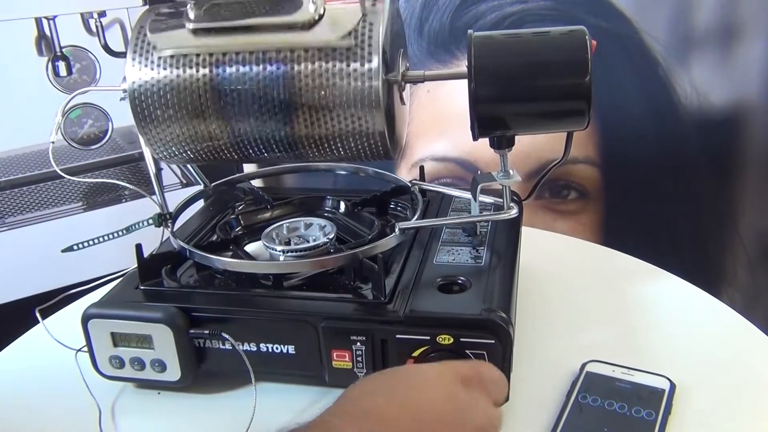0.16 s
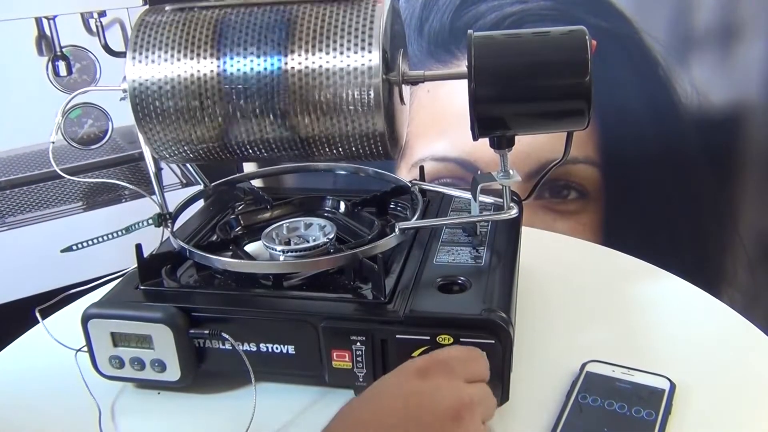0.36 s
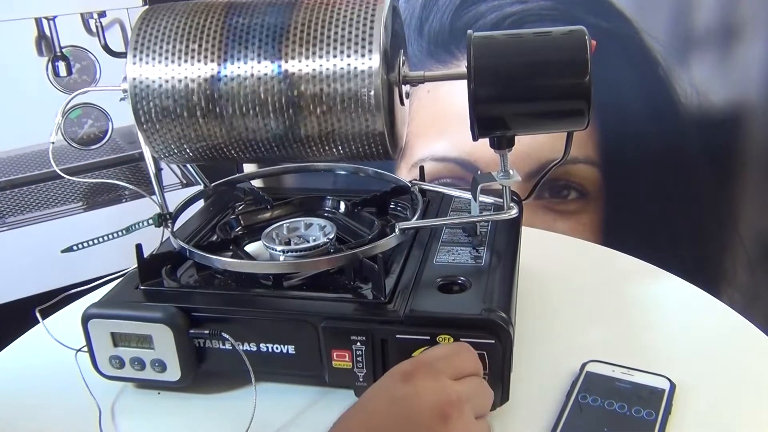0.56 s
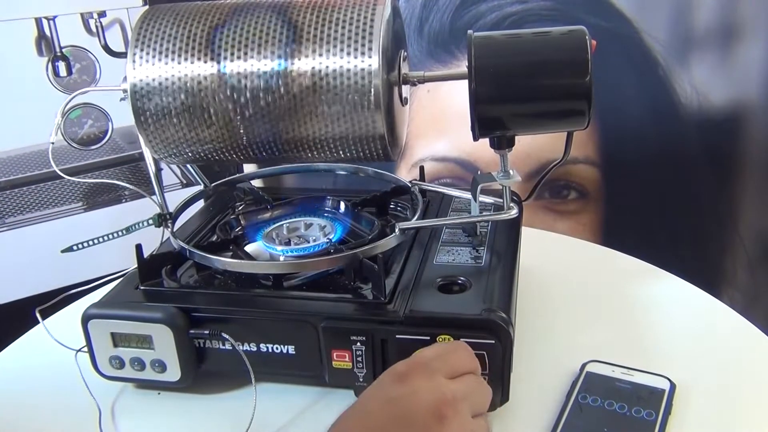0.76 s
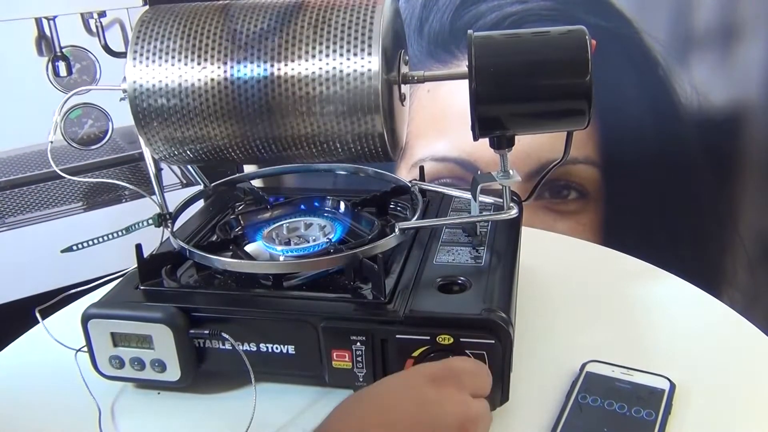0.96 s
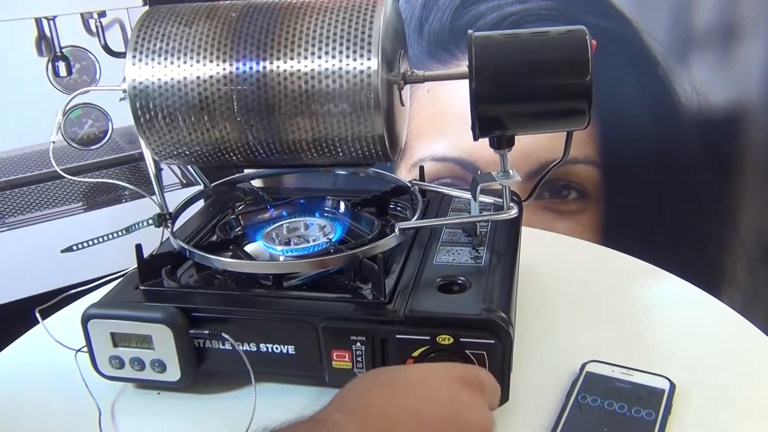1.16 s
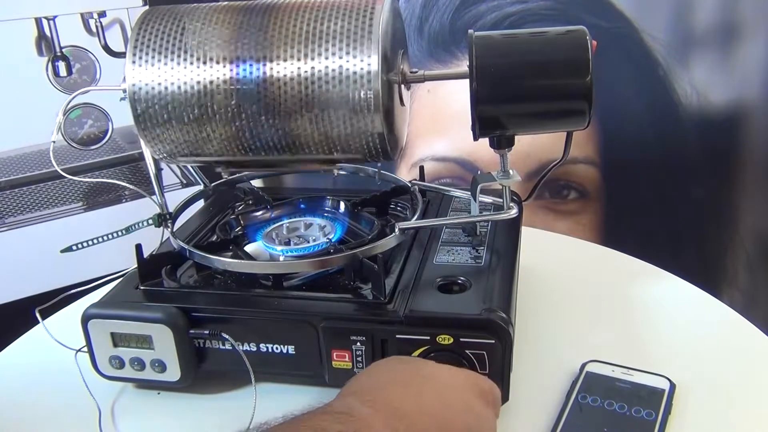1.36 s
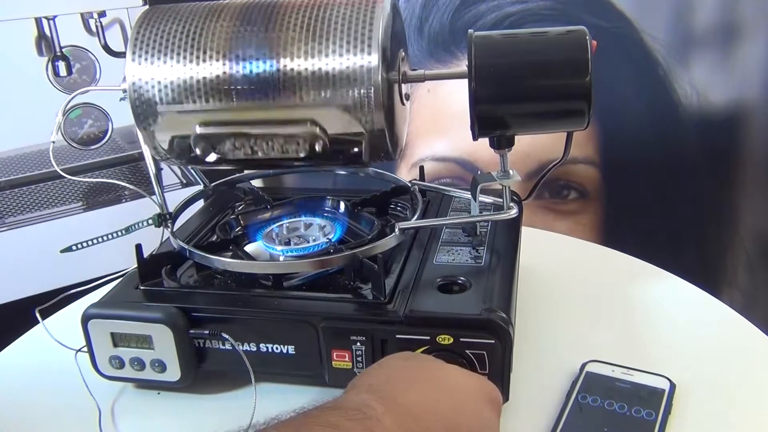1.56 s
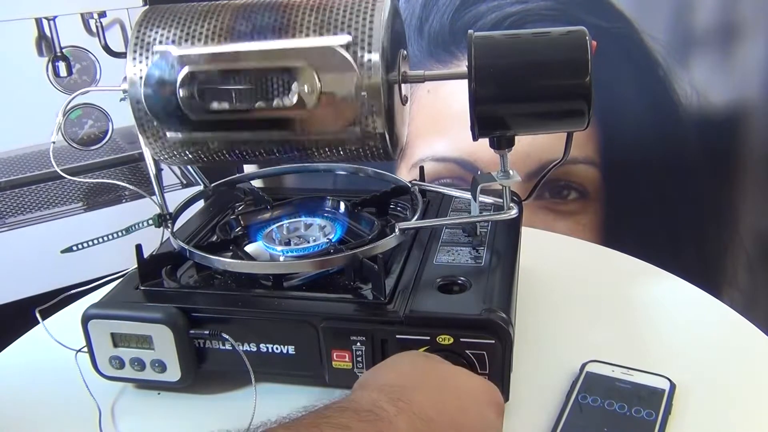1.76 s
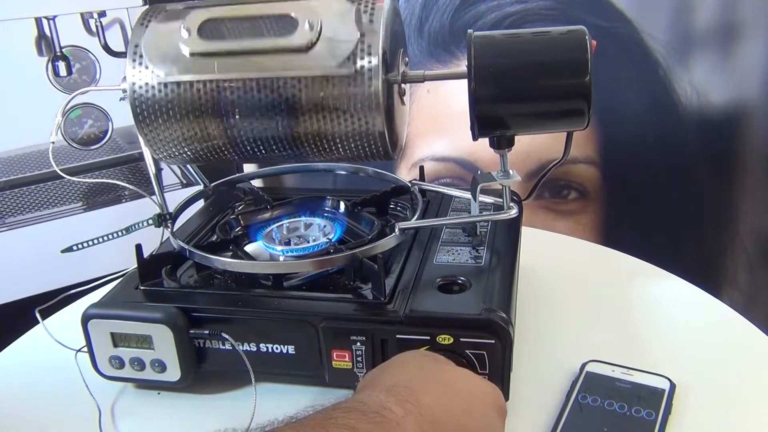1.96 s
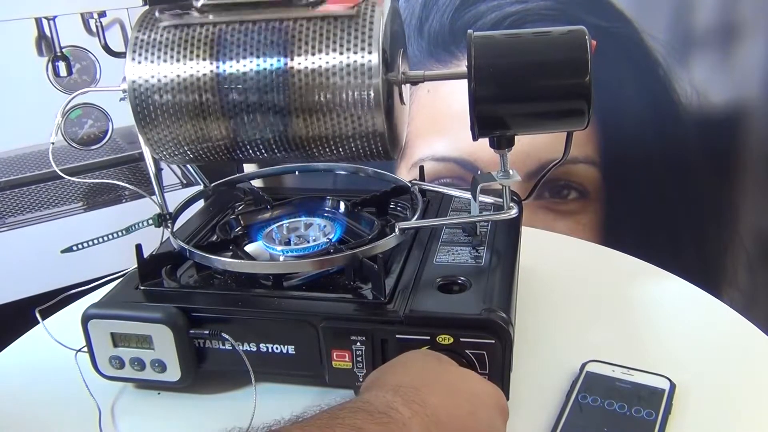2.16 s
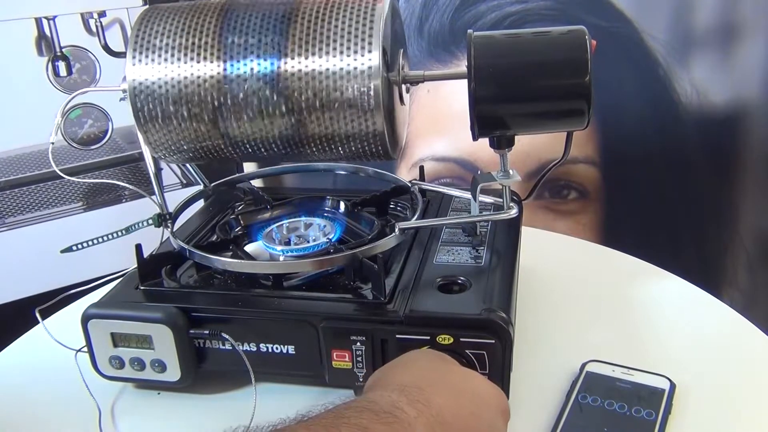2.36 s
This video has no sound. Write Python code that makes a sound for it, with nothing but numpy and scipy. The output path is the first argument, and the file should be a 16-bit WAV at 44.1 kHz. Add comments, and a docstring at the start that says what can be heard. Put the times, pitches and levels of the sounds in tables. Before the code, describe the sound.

Bright rushing rustle of beans sliding in a steel drum, with one sharp stove igniter snap

```python
"""Coffee beans in a roasting drum

Beans tumble in a perforated steel drum over a small gas stove: thousands of random taps excite ringing sheet.
An igniter snaps (two beating sines), the stove rattles (struck modes) and the flame catches
(shaped, lumpy noise with low thuds), over a hum of motor, gas and room (filtered noise)."""
import sys
import numpy as np
from scipy import signal
from scipy.fft import rfft, irfft
from scipy.io import wavfile
from scipy.ndimage import uniform_filter1d

SR = 44100
rng = np.random.default_rng(int(sys.argv[2]) if len(sys.argv) > 2 else 0)


def attenuation_scalar(level_db):
    """Turn a level in dB into a linear amplitude multiplier (20 dB per decade)."""
    decades = np.asarray(level_db, float) / 20
    return 10 ** decades


def materialize(psi):
    """Save the field psi as 16-bit PCM at rate SR to the path in sys.argv[1].

    A 1-D psi becomes a single channel; in a 2-D psi each row is a channel.
    """
    bounded = np.clip(np.atleast_2d(psi).T, -1, 1)
    quanta = np.round(bounded * 32767).astype(np.int16)
    wavfile.write(sys.argv[1], SR, quanta)


N = 106854


def evened(x):
    """Scales to rms 1."""
    return x / np.sqrt(np.mean(x ** 2) + 1e-20)


def read(points, hz):
    """Reads a spectrum table on a log frequency axis."""
    f, value = np.transpose(points)
    return np.interp(np.log(hz + 1), np.log(f + 1), value)


def curve(table, column):
    """Interpolates one column of a time table at every sample."""
    return np.interp(np.arange(N) / SR, [row[0] for row in table], [row[column] for row in table])


def colour(x, points):
    """Causal minimum-phase filter with the given spectrum, from its log magnitude."""
    hz = np.abs(np.fft.fftfreq(4096, 1 / SR))
    log_gain = np.maximum(read(points, hz), -90) * np.log(10) / 20
    impulse = np.fft.ifft(np.exp(np.conj(signal.hilbert(log_gain)))).real[:2048]
    return signal.oaconvolve(x, impulse)[:len(x)]


def resonate(x, hz, width_hz):
    """Resonance of gain 1 that can follow a pitch curve: shift to 0 Hz, smooth, shift back."""
    turn = np.exp(2j * np.pi * np.cumsum(hz * np.ones(len(x))) / SR)
    r = np.exp(-np.pi * width_hz / SR)
    return 2 * (turn * signal.lfilter([1 - r], [1, -r], x / turn)).real


def burst(t60_s, db):
    """Click followed by a dying noise scatter; db is scatter energy over click energy."""
    t = np.arange(4000) / SR
    tail = rng.standard_normal(len(t)) * attenuation_scalar(-60 * t / t60_s)
    return np.append(1, attenuation_scalar(db) * tail / np.linalg.norm(tail))


def band(x, hz, kind):
    """Low or high pass without delay."""
    low = 1 / (1 + (np.fft.rfftfreq(N, 1 / SR) / hz) ** 6)
    gain = low if kind == "low" else 1 - low
    return irfft(rfft(x) * gain, N)


def sway():
    """Slow random wander of rms 1, a few swings a second."""
    steps = evened(uniform_filter1d(rng.standard_normal(40), 3))
    return np.interp(np.arange(N), np.linspace(0, N, 40), steps)


def hum():
    """Noise rumble in three swelling bands, resonated motor tones, and a left-minus-right noise part."""
    # motor, gas and room: (frequency [Hz], density [dB per Hz])
    hum_colour = [(15, -45), (30, -12), (70, -17), (110, -12), (205, -1), (290, -6), (370, 1), (470, -10.5),
                  (560, -3), (700, -8.5), (860, -2), (1050, -8), (1600, -6), (2100, -13), (3500, -90)]
    # swells: (time [s], below 110 Hz [dB], 110-560 Hz [dB], above 560 Hz [dB])
    hum_level = [(0.0, -85, -60.5, -49.5), (0.2, -75, -54, -49.5), (0.36, -69, -64, -54),
                 (0.5, -53.5, -58.5, -55), (0.67, -59, -66, -58), (0.97, -66, -80, -58),
                 (1.13, -69, -55, -76), (1.32, -65, -51, -59.5), (1.46, -61, -60, -61.5),
                 (1.68, -74, -54.5, -64), (1.83, -70, -48.5, -58), (1.96, -71, -55, -58),
                 (2.16, -78, -56.5, -57), (2.42, -59, -63.5, -54)]
    # wavering motor tones: (frequency [Hz], level [dB], width of each of two passes [Hz])
    motor = [(204, -64.5, 12), (423.7, -66.5, 3.2)]
    # left-minus-right part: (frequency [Hz], density [dB per Hz])
    hum_wide = [(12, -31), (20, 17), (209, 11), (600, 2), (900, -10), (1300, -50), (3300, -120)]
    wide_db = -65.5

    z = rfft(rng.standard_normal((3, N)), axis=1)
    hz = np.fft.rfftfreq(N, 1 / SR)
    wash = irfft(z[0] * attenuation_scalar(read(hum_colour, hz)), N)
    deep, high = band(wash, 110, "low"), band(wash, 560, "high")
    parts = (deep, wash - deep - high, high)
    mid = sum(evened(part) * attenuation_scalar(curve(hum_level, k)) for k, part in enumerate(parts, 1))
    noise = irfft(z[1], N)
    for tone_hz, db, width_hz in motor:
        mid += attenuation_scalar(db) * evened(resonate(resonate(noise, tone_hz, width_hz), tone_hz, width_hz))
    side = attenuation_scalar(wide_db) * evened(irfft(z[2] * attenuation_scalar(read(hum_wide, hz)), N))
    return mid, side


def flame():
    """Gas catching: coloured noise with a fast rise, a hold, an exponential fall and lumpy level."""
    # catching flame: (frequency [Hz], density [dB per Hz])
    flame_colour = [(35, -60), (60, -14), (233, -2), (710, -5), (923, 14.5), (1390, -1), (1930, -7),
                    (3000, 5), (3900, -17), (6600, -120)]
    start_s, rise_s, hold_s, fall_s = 0.669, 0.014, 0.097, 0.049
    level_db, lumps_db = -40, 2.7  # noise rms before shaping; rms of the level's wander

    t = np.arange(N) / SR - start_s
    shape = np.clip(t / rise_s, 0, 1) * np.exp(-np.maximum(t - rise_s - hold_s, 0) / fall_s)
    lumps = attenuation_scalar(lumps_db * evened(uniform_filter1d(rng.standard_normal(N), 400)))
    return attenuation_scalar(level_db) * shape * lumps * evened(colour(rng.standard_normal(N), flame_colour))


def thuds():
    """Stove case: low sines that swell in softly and die fast."""
    # soft thuds: (time [s], level before rise and decay [dB], frequency [Hz])
    thud_table = [(.718, -37.5, 242), (0.786, -33.5, 240)]
    rise_s, t60_s = .008, .11

    out, t = np.zeros(N), np.arange(6000) / SR
    for start_s, db, hz in thud_table:
        envelope = attenuation_scalar(db - 60 * t / t60_s) * np.minimum(t / rise_s, 1)
        out[round(start_s * SR):][:len(t)] += envelope * np.sin(2 * np.pi * hz * t)
    return out


def stove():
    """Each blow rings the same body modes, tilted by how hard it strikes, damped by how freely they ring."""
    # blows: (time [s], level [dB], brightness [0-1], freedom to ring, scales t60 [0-1])
    knocks = [(.3, -43, 0.9, .6), (0.677, -43, 0.9, 0.4), (0.6821, -30.5, 0.83, 0.9), (0.69, -39, 1, 0.1),
              (0.696, -28.5, 0.7, 0.22), (0.703, -32.5, 0.72, 0.83), (.715, -33, 0.66, 0.55),
              (0.727, -30, 0.46, 0.6), (0.743, -36.5, 0.66, 0.97), (0.771, -41, 0.6, 1),
              (0.794, -36.5, 0.47, 0.47), (1.141, -41, 0.95, 1), (2.0135, -31.5, 0.64, 0.26),
              (2.0172, -35, 0.36, 0.4), (2.022, -39, 0.2, 0.7)]
    # body modes: (frequency [Hz], relative level [dB], t60 at full freedom [s])
    modes = [(355, -7, 0.15), (492, -6, .07), (617, -5, 0.07), (800, -5, 0.06), (950, -7, 0.07),
             (1060, -6, 0.1), (1210, -4, 0.09), (1787, 3, 0.16), (2050, -3, 0.07), (2482, -3, .1),
             (2670, -7, 0.12), (2970, -4, 0.04), (3430, -8, .04)]
    pitch_spread = .08  # loose parts shift modes between blows, share of pitch, edge to edge
    gain_spread_db = 2  # each blow favours other modes, plus or minus
    tilt_db_per_octave, attack_s = 11, .0005  # tilt between softest and hardest blow

    out, t = np.zeros(N + 9000), np.arange(9000) / SR
    for start_s, db, bright, free in knocks:
        ring = np.zeros(len(t))
        for hz, mode_db, t60_s in modes:
            p, u = rng.random(2)
            tilt_db = tilt_db_per_octave * (bright - .5) * np.log2(hz / 1500)
            gain_db = mode_db + gain_spread_db * (2 * u - 1) + tilt_db
            shifted_hz = hz * (1 + pitch_spread * (p - .5))
            ring += attenuation_scalar(gain_db - 60 * t / t60_s / free) * np.sin(2 * np.pi * (shifted_hz * t + p / (2 * np.pi))
                                                                  + (2 * np.pi - 1) * p)
        out[round(start_s * SR):][:len(t)] += attenuation_scalar(db) * ring * np.minimum(t / attack_s, 1)
    return signal.oaconvolve(out, burst(0.04, -12))[:N]


def igniter():
    """Spring hammer: a bright snap of two close, beating rings."""
    start_s, level_db, rise_s, t60_s = .676, -13.5, .004, .045  # level per ring before rise and decay
    upper_hz, lower_hz = 4290, 4040

    out, t = np.zeros(N), np.arange(3000) / SR
    envelope = attenuation_scalar(level_db - 60 * t / t60_s) * np.minimum(t / rise_s, 1)
    rings = np.sin(2 * np.pi * upper_hz * t) - np.sin(2 * np.pi * lower_hz * t)
    out[round(start_s * SR):][:len(t)] = envelope * rings
    return out


def sheet_taps(level):
    """Random taps scatter in the sheet patches now under the heap; clear drops add noise puffs."""
    # handfuls dropping clear of the heap: (time [s], level before drum colouring [dB], t60 [s])
    drops = [(0.042, -22, 0.035), (0.489, -24, 0.053), (0.678, -18, 0.037), (0.916, -14, 0.053),
             (1.382, -28, 0.083), (1.964, -17.5, 0.07), (2.243, -18.5, 0.078), (2.25, -27, .025),
             (2.297, -26, 0.23), (2.342, -23.5, 0.037), (2.364, -34, 0.016), (2.376, -21, 0.048)]
    peak_taps_per_s, spread_db = 6000, 2.5
    thinning = .6  # weak slides have fewer taps: 0 = as many, 1 = in step with amplitude
    patch_s, patch_t60_s, patch_db = .1, 0.1, 2.5  # a new patch turns under the heap every patch_s
    patches = 29  # all that turn under within the scene

    size = attenuation_scalar(spread_db * np.minimum(rng.exponential(1, N), 5)) * rng.choice([-1., 1.], N)
    busy = (level / level.max()) ** thinning
    hit = rng.random(N) < busy * peak_taps_per_s / SR
    size = evened(size * hit / np.sqrt(busy)) * level
    rms = np.sqrt(np.mean(size ** 2))
    # each tap picks one of about four neighbouring patches
    patch = (np.arange(N) / SR / patch_s + 4 * rng.random(N)).astype(int)
    sides = np.zeros((2, N))
    for k in range(patches):
        sides[k % 2] += signal.oaconvolve(size * (patch == k), burst(patch_t60_s, patch_db))[:N]
    sides = rms * evened(sides) / np.sqrt(2)
    t = np.arange(6000) / SR
    for start_s, db, t60_s in drops:
        puff = attenuation_scalar(db - 60 * t / t60_s) * rng.standard_normal(len(t))
        part = sides[0, round(start_s * SR):][:len(t)]
        part += puff[:len(part)]
    return sides, rms


def drum_rings(taps):
    """Drum resonances swell and drift as the load shifts."""
    # strongest rings: (frequency [Hz], width [Hz], relative level [dB])
    drum = [(1531, 10.4, -4.5), (1970, 37, -24.5), (2686, 11, -11), (3040, 7.9, -2.5), (3290, 26, -9),
            (3590, 43, -10.5), (3800, 35, -5.5), (4120, 18, -4.5), (4790, 10, -17), (5480, 75, -1.5),
            (5850, 69, 1), (6190, 57, 1.5), (6850, 15, -7), (6945, 22, -3.5), (7600, 30, -13),
            (7930, 35, 7), (8220, 15, -9), (8570, 85, 7), (8790, 110, 1), (9600, 7.7, 4)]
    sway_db, drift = 4.5, .0012  # rms; drift as a share of pitch

    rings = np.zeros(N)
    for hz, width_hz, db in drum:
        gain = attenuation_scalar(db + sway_db * sway())
        rings += gain * resonate(taps, hz * (1 + drift * sway()), width_hz)
    return rings


def beans():
    """Sliding heap: coloured taps plus drum rings, their bands swaying apart, with a left-minus-right part."""
    # slide: (time [s], level [dB], below 3.4 kHz [dB], 3.4-4.2 kHz [dB]); bands act about their means
    slide = [(0.0, -17.5, -14, -18), (0.01, -18.5, -22.5, -12.5), (0.25, -18, -24, -17),
             (0.43, -27.5, -24.5, -9.5), (0.56, -18, -23.5, -4.5), (0.65, -18, -29, -11.5),
             (0.69, -18, -17, -12), (0.9, -18, -25, -7.5), (1.0, -16.5, -22, -20), (1.15, -17.5, -18, -14),
             (1.35, -32, -16.5, -7), (1.48, -18.5, -19.5, -22), (1.52, -16.5, -23.5, -16),
             (1.74, -18, -21.5, -20.5), (1.85, -24.5, -20.5, -10), (2.03, -16, -24, -42.5),
             (2.14, -18, -23, -14), (2.21, -24.5, -21.5, -21), (2.237, -32, -20, -5), (2.25, -25, -34, -20),
             (2.27, -34.5, -28, -3.5), (2.42, -21, -24, -12.5)]
    # tap colour: (frequency [Hz], relative density [dB per Hz])
    tap_colour = [(530, -51), (900, -32.5), (1100, -34), (1510, -24), (1660, -20.5), (1910, -17.5),
                  (2230, -24.5), (2940, -18), (3390, -16.5), (3690, -11), (4980, -13), (7940, 1),
                  (13400, -18.5), (15700, -25.5)]
    # treble above 10.4 kHz: (time [s], level [dB])
    treble = [(0.0, -36), (0.04, -29), (0.32, -31), (0.36, -43), (0.48, -37), (0.5, -27.5), (0.67, -25),
              (0.69, -36.5), (0.81, -25.5), (1.11, -25.5), (1.34, -43), (1.37, -49), (1.39, -33),
              (1.42, -46), (1.45, -37), (1.49, -25.5), (1.78, -32.5), (1.89, -46), (1.99, -29.5),
              (2.11, -34), (2.29, -44), (2.3, -37), (2.36, -41.5), (2.42, -33.5)]
    # left-minus-right colour: (frequency [Hz], relative density [dB per Hz])
    wide_colour = [(2060, -118), (3500, -86), (4350, -52), (5150, -10.5), (7580, 4), (9920, -5.5),
                   (12000, -45), (15600, -63), (22000, -120)]
    rings_db, wide_db, lean_db = -8, -16, 1.2  # rings and width re taps; left over right

    level = attenuation_scalar(curve(slide, 1))
    sides, rms = sheet_taps(level)
    taps = sides[0] + sides[1]
    rings = evened(drum_rings(taps))
    full = rms * evened(evened(colour(taps, tap_colour)) + attenuation_scalar(rings_db) * rings)

    top = band(full, 10400, "high")
    low = band(full, 3400, "low")
    body = band(full, 4200, "low")
    low_db, body_db = curve(slide, 2), curve(slide, 3)
    mid = full - top - body
    mid += low * attenuation_scalar(low_db - low_db.mean())
    mid += (body - low) * attenuation_scalar(body_db - body_db.mean())
    mid += evened(top / level) * attenuation_scalar(curve(treble, 1))

    side = rms * attenuation_scalar(wide_db) * evened(colour(sides[0] - sides[1], wide_colour))
    lean = attenuation_scalar(lean_db / 2)
    return np.array([mid * lean + side, mid / lean - side])


def scene():
    """Mixes all sources; the deepest bass survives only as a left-minus-right difference."""
    hum_mid, side = hum()
    blows = igniter() + stove() + thuds() + flame()
    scatter = signal.oaconvolve(blows, burst(0.071, 20.5))[:N]
    side = side + attenuation_scalar(-35) * band(scatter, 1300, "low")
    near = beans() + blows + hum_mid * attenuation_scalar(np.array([[1.1], [-1.1]]))  # hum leans left
    return band(near, 67, "high") + side * np.array([[1], [-1]])


def roll_off(x):
    """The treble ends steeply here."""
    return signal.sosfilt(signal.butter(12, 15840, fs=SR, output="sos"), x)


def record(dry):
    """Delivers the finished stereo mix."""
    return roll_off(dry)


dry = scene()
out = record(dry)
materialize(out)
```